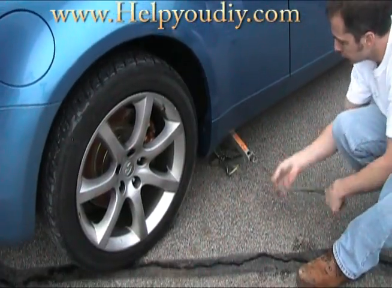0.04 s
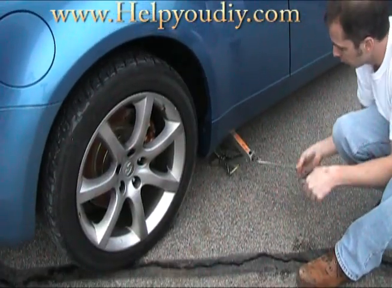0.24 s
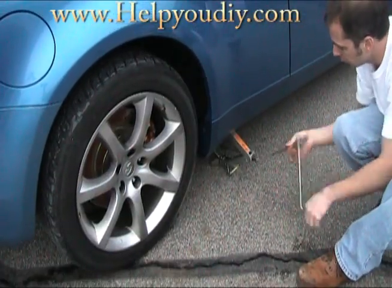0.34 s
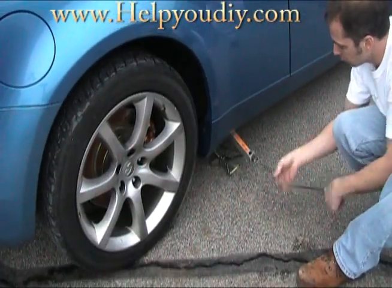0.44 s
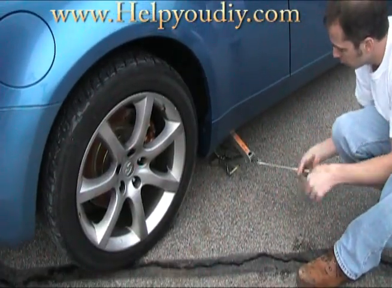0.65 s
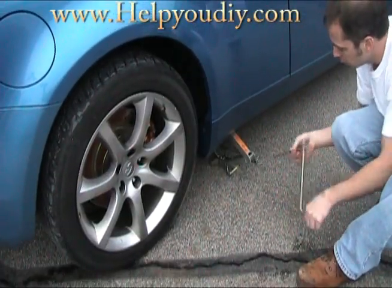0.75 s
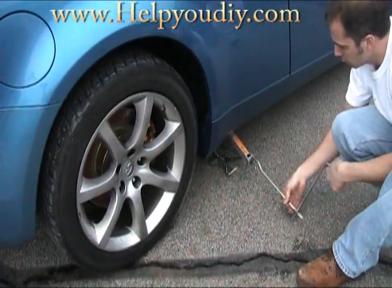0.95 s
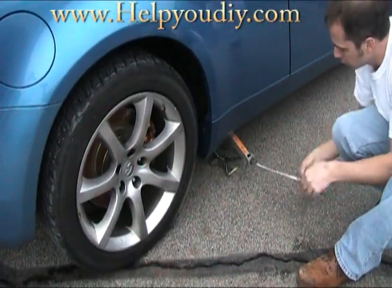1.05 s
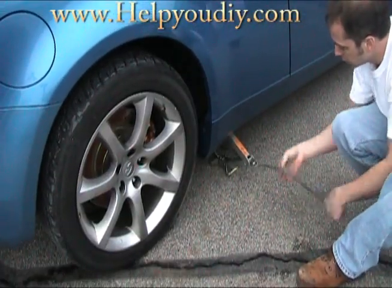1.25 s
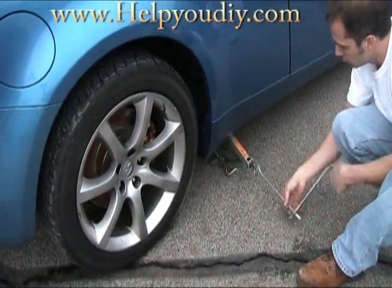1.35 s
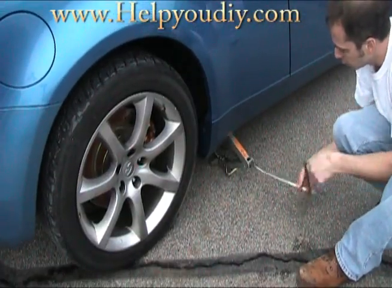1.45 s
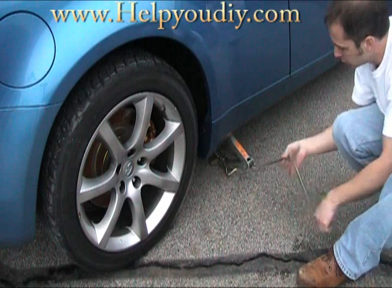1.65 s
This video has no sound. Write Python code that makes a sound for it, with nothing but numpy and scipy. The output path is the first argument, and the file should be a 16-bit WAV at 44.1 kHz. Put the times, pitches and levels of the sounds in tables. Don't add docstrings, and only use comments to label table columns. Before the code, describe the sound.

Metal jack handle: an early tick, then a sharp jangling rattle that rings briefly, followed by quiet ticks in small clusters near the end. Open paved yard with short slapback, low traffic hum, a camcorder microphone nearby.

```python
import sys
import numpy as np
from scipy import signal
from scipy.fft import rfft, irfft
from scipy.io import wavfile
from scipy.ndimage import uniform_filter1d

SR = 44100
rng = np.random.default_rng(int(sys.argv[2]) if len(sys.argv) > 2 else 0)


def amplitude_ratio(level_db):
    exponent = np.asarray(level_db, float) / 20
    return 10 ** exponent


def store_pcm(level_fs):
    pcm = np.round(np.clip(level_fs, -1, 1) * 32767).astype(np.int16)
    wavfile.write(sys.argv[1], SR, np.atleast_2d(pcm).T)


N = 72765

# (frequency [Hz], density [dB per Hz])
TRAFFIC_COLOUR = [(15, -36.5), (25, -5.5), (133, -3), (281, -7.5), (544, -7.5), (629, -6), (894, -6.5),
                  (2850, -20), (3500, -26), (4550, -58), (7700, -120)]
# (frequency [Hz], likeness [0-1])
AIR_LIKENESS = [(60, 0.63), (130, 0.7), (290, 0.6), (640, 0.8), (1410, 0.7), (3100, 0), (6820, 0.4),
                (15000, 0)]
# (frequency [Hz], lead [rad])
AIR_LEADS = [(25, 1.1), (150, .35), (1000, .2)]
# (frequency [Hz], density [dB per Hz])
RUSTLE_COLOUR = [(1470, -30.5), (2500, -8.5), (2830, -11), (3230, -7.5), (4650, -7.5), (5610, -9.5),
                 (8200, -14.5), (14100, -23.5), (16000, -25.5)]
# (time [s], frequency [Hz], level [dB])
DRONE_LINE = [
    (0, 132.3, -63.5),
    (.5, 130.3, -62.5),
    (.58, 129.4, -53),
    (.7, 130.7, -67),
    (1.15, 131.6, -60),
    (1.43, 131.5, -50.5),
    (1.65, 130.4, -58.5),
]
# (time [s], length [s], level [dB], centre frequency [Hz])
CLOTH_SWELLS = [
    (.01, 0.028, -63.5, 7200),
    (0.71, 0.046, -66.5, 7400),
    (0.967, 0.024, -65, 4200),
    (1.191, 0.042, -67.5, 6960),
    (1.44, 0.037, -66, 4400),
    (1.632, 0.034, -62.5, 8040),
]
# (time [s], frequency [Hz], level [dB], t60 [s])
THUDS = [
    (0.054, 342, -41.5, 0.083),
    (.178, 285, -42.5, 0.075),
    (.234, 340, -33.5, 0.038),
    (.236, 517, -34.5, 0.035),
    (.238, 775, -37.5, 0.049),
    (0.261, 174.8, -42, 0.11),
    (1.031, 136, -33, 0.029),
]
# (frequency [Hz], level [dB])
METAL_LEFT_DB = [(500, 0), (4400, -3), (8000, -2.2), (15000, -4.5)]
# (frequency [Hz], lead [rad])
METAL_LEFT_LEADS = [(1000, .2), (4700, .45), (11000, .3), (11800, 1.3)]
# (frequency [Hz], level [dB], t60 [s])
FRAME_MODES = [(1100, -11, .04), (1593, -10, .045), (2000, -11, .04), (2338, 0, .05), (2930, -1, .045),
               (3600, -7, .035), (4470, -3, .04), (6350, -3, .03), (7000, -2, .05), (7400, -4, .035),
               (8300, -5, .03), (9400, -7, .035), (11500, -14, .025), (12600, -9, .022)]
# (time [s], ring level [dB], brightest frequency [Hz], rattle level [dB])
CLINKS = [(.1385, -54, 3300, -64.5), (.1573, -44, 2970, -35), (.1590, -41.5, 7930, -39),
          (.1630, -28, 1260, -47.5), (.2135, -61.5, 8550, -61.5), (.5915, -52.5, 4760, -55),
          (.5935, -55.5, 9720, -65.5), (.6400, -62.5, 4500, -81.5), (.6870, -62, 2820, -74),
          (.7775, -60, 9000, -60), (.7790, -53, 3320, -58), (.8445, -57, 3550, -53),
          (.8790, -81, 8250, -63.5), (.9270, -65, 7340, -56.5), (.9305, -63, 2300, -55),
          (.9360, -55, 3500, -47), (.9395, -62, 3200, -62), (.9430, -67, 4920, -71),
          (.9505, -68, 4500, -68), (.9830, -62.5, 4500, -68), (.9640, -72, 8000, -62),
          (.9890, -55, 4360, -48), (.9915, -49, 4500, -58), (.9962, -44.5, 7040, -39.5),
          (.9968, -46, 2210, -40), (1.0045, -76, 2270, -42.5), (1.1250, -63.5, 4490, -62.5),
          (1.2400, -66.5, 5450, -61.5), (1.3805, -59, 3030, -53), (1.4060, -58, 4500, -46.5),
          (1.4076, -47, 2300, -44), (1.4080, -52, 6400, -58.5), (1.4110, -50, 4300, -53),
          (1.4160, -66, 2400, -58), (1.4200, -59, 2980, -45), (1.4350, -60, 11500, -52),
          (1.4385, -61.5, 6980, -61), (1.4428, -42, 6650, -39.5), (1.4434, -41.5, 2900, -44.5),
          (1.4440, -49, 12600, -64), (1.4500, -56, 2870, -49), (1.4765, -55.5, 3153, -53.5),
          (1.6060, -72, 7400, -61), (1.6270, -61.5, 3230, -66)]
# (frequency [Hz], density [dB per Hz])
CLINK_COLOUR = [(470, -30), (800, 0), (2300, 0), (3890, -4), (4620, -4.5), (5420, -8.5), (7190, -7),
                (10500, -19.5), (15000, -48)]
# (frequency [Hz], level [dB], t60 [s])
GRIPPED_MODES = [(3094, -50, .2), (4780, -68, .25), (5700, -47, .11), (6433, -68, .2), (7390, -54, .09),
                 (8118, -55, .12), (8685, -58, .09), (11370, -68, .2), (11960, -64, .2), (13800, -62, .15)]
# (frequency [Hz], t60 [s])
ROD_MODES = [(2330, .055), (3094, .17), (3983, .06), (4613, .07), (4778, .045), (5690, .12), (6480, .05),
             (6640, .05), (7405, .06), (8016, .045), (8168, .055), (8770, .045), (9356, .045), (11880, .05),
             (2060, .04), (10690, .1), (11945, .07), (13770, .075), (14900, .12), (15725, .065)]
FIRST_ROD_MODE_DB = [-2.5, -8, -10, -7.5, -9.5, -20.5, -10.5, -10, -13, -6, -11, -6.5, -9, -6.5]
LAST_ROD_MODE_DB = [-7.5, -28.5, -2.5, -18, -28, -20]
# (time [s], ring level [dB], brightest frequency [Hz], rattle level [dB])
CLATTER = [(.2290, -44, 6080, -36.5), (.2322, -21.5, 4070, -26), (.2368, -17, 6100, -24),
           (.2392, -14.5, 4880, -28.5), (.2415, -18.5, 9200, -19.5), (.2437, -21, 8600, -24.5),
           (.2462, -19, 6800, -21), (.2480, -20, 4700, -32.5), (.2500, -22.5, 8600, -37),
           (.2545, -18.5, 3210, -29), (.2580, -23, 8600, -31), (.2615, -23, 4000, -28),
           (.2700, -32.5, 11100, -38), (.2780, -40.5, 8000, -37), (.2850, -45.5, 9030, -44)]
# (frequency [Hz], density [dB per Hz])
CLATTER_COLOUR = [(290, -52.5), (500, -3.5), (2850, -15), (3110, -14.5), (4730, -8), (5390, -13.5),
                  (6420, -12), (12100, -20), (16000, -29)]

TRAFFIC_DB, RUSTLE_DB, DRONE_HALF_DB = -46, -62.5, -61.5
FLOOR_TOP_HZ = 15100
CLOTH_SPREAD_OCT, CLOTH_GRAIN_DB = 0.55, 2.5
YARD_DB, YARD_T60_S, YARD_TOP_HZ = -15, 0.17, 12000
YARD_BLUR_HZ = 420
WALL_S, WALL_DB, WALL_T60_S = 0.069, -23.5, 0.028
FAR_S, FAR_DB, FAR_T60_S = 0.11, -39.5, 0.35
SCATTER_DB, RATTLE_SPREAD_OCT = 1.5, 1.5
CRACK_T60_S, KNOCK_T60_S = 0.012, 0.024
SEAT_S, SEAT_DB, NODE_HZ = 0.2648, -5, 3094
GRIP_S, GRIP_DB, GRIP_TAKES_S = 0.297, -17, 0.008
AFTER_S, AFTER_RISE_S = 0.37, 0.0049
MIC_DIP_HZ, MIC_DIP_DB, MIC_DIP_OCT, MIC_CEILING = 5325, -5, 0.13, 0.7


def read(table, hz):
    t = np.array(table, float)
    return np.interp(np.log(np.maximum(hz, 1)), np.log(t[:, 0]), t[:, 1])


def curve(table, column):
    t = np.array(table, float)
    return np.interp(np.arange(N) / SR, t[:, 0], t[:, column])


def unit(x):
    return x / np.sqrt(np.mean(x ** 2))


def walk(rate):
    k = int(SR / rate)
    held = np.repeat(rng.standard_normal(N // k + 1), k)
    return 1.3 * uniform_filter1d(uniform_filter1d(held, k), k)[:N]


def time_since(s):
    return np.maximum(np.arange(N) / SR - s, 0)


def air(colour, centres_hz, flicker_db):
    hz, out = np.fft.rfftfreq(N, 1 / SR), 0
    like = read(AIR_LIKENESS, hz) ** .5
    turn = np.exp(.5j * read(AIR_LEADS, hz))
    mid, side = (rfft(rng.standard_normal(N)) * amplitude_ratio(read(colour, hz)) for _ in range(2))
    mid, side = mid * np.sqrt(1 + like), side * np.sqrt(1 - like)
    pair = np.array([(mid + side) * turn, (mid - side) / turn])
    for centre in centres_hz:
        octaves = np.log2(np.maximum(hz, 1) / centre)
        band = np.cos(np.pi / 2 * np.clip(octaves, -1, 1)) ** 2
        out = out + irfft(pair * band, N) * amplitude_ratio(flicker_db * walk(13))
    return unit(out)


def traffic():
    return amplitude_ratio(TRAFFIC_DB) * air(TRAFFIC_COLOUR, 2. ** np.arange(4, 13), 0.69)


def drone():
    phase = 2 * np.pi * np.cumsum(curve(DRONE_LINE, 1)) / SR
    firing = amplitude_ratio(curve(DRONE_LINE, 2)) * np.sin(phase)
    half = amplitude_ratio(DRONE_HALF_DB + 3 * walk(6)) * np.sin(phase / 2)
    return np.sqrt(2) * (firing + half)


def cloth():
    t, hz, out = np.arange(N) / SR, np.maximum(np.fft.rfftfreq(N, 1 / SR), 1), 0
    noise = rng.standard_normal(N) + .5 * rng.standard_normal((2, N))
    grains = rfft(noise * amplitude_ratio(CLOTH_GRAIN_DB * walk(160)))
    for s, length, db, centre_hz in CLOTH_SWELLS:
        tone = amplitude_ratio(-6 * (np.log2(hz / centre_hz) / CLOTH_SPREAD_OCT) ** 2)
        swell = np.exp(-.5 * ((t - s) / length) ** 2)
        out = out + amplitude_ratio(db) * swell * unit(irfft(grains * tone, N))
    return out


def rustle_and_cloth():
    rustle = amplitude_ratio(RUSTLE_DB) * air(RUSTLE_COLOUR, 2. ** np.arange(12, 15), 0.78)
    top = signal.ellip(8, .2, 60, FLOOR_TOP_HZ, fs=SR, output="sos")
    return signal.sosfilt(top, rustle + cloth())


def thuds():
    out = 0
    for s, hz, db, t60 in THUDS:
        t = time_since(s)
        out = out + 2 * amplitude_ratio(db - 60 * t / t60) * (1 - np.exp(-t / 0.0047)) * np.sin(2 * np.pi * hz * t)
    return out


def yard(x):
    t = np.arange(SR // 2) / SR
    shape = amplitude_ratio(YARD_DB - 60 * t / YARD_T60_S)
    shape = shape + (t > WALL_S) * amplitude_ratio(WALL_DB - 60 * (t - WALL_S) / WALL_T60_S)
    shape = shape + (t > FAR_S) * amplitude_ratio(FAR_DB - 60 * (t - FAR_S) / FAR_T60_S)
    same, own = rng.standard_normal(len(t)), rng.standard_normal((2, len(t)))
    tail = (same + .6 * own) * shape / np.sqrt(YARD_T60_S * SR / 14)
    tail = signal.sosfilt(signal.butter(2, YARD_TOP_HZ, fs=SR, output="sos"), tail)
    blurred = x * walk(YARD_BLUR_HZ)
    return signal.fftconvolve(blurred[None], tail, axes=1)[:, :N]


def ports(x):
    hz = np.fft.rfftfreq(N, 1 / SR)
    half = amplitude_ratio(read(METAL_LEFT_DB, hz) / 2) * np.exp(.5j * read(METAL_LEFT_LEADS, hz))
    return np.array([irfft(rfft(x) * half, N), irfft(rfft(x) / half, N)])


def near(hz, top_hz, spread_oct):
    return -6 * (np.log2(np.maximum(hz, 1) / top_hz) / spread_oct) ** 2


def strikes(hits, modes, spread_oct, colour, rattle_t60, contact_db, crack_db, knock, rise_s):
    size = 16384
    out, t, bins = np.zeros(N + size), np.arange(size) / SR, np.fft.rfftfreq(size, 1 / SR)
    hz, db, t60 = np.array(modes, float).T[:, :, None]
    times = np.array(hits)[:, :1]
    for s, ring_db, top_hz, rattle_db in hits:
        scatter_db = SCATTER_DB * rng.standard_normal(hz.shape)
        gain = amplitude_ratio(ring_db + db + near(hz, top_hz, spread_oct) + scatter_db)
        gain = gain * rng.choice([-1, 1], hz.shape)
        later = np.sum((times > s) * np.clip((t + s - times) / .001, 0, 1), axis=0)
        fade_db = -60 * t / t60 + contact_db * later * (hz < 14000) * hz / 10000
        seat_db = SEAT_DB * (s < SEAT_S) * np.clip((t + s - SEAT_S) / .001, 0, 1)
        fade_db = fade_db + seat_db * (hz != NODE_HZ) * (hz < 14000)
        ring = np.sum(gain * amplitude_ratio(fade_db) * np.sin(2 * np.pi * hz * t), axis=0)
        ring = ring * (1 + knock * amplitude_ratio(-60 * t / KNOCK_T60_S))
        tone = amplitude_ratio(read(colour, bins) + near(bins, top_hz, RATTLE_SPREAD_OCT))
        rattle = unit(irfft(rfft(rng.standard_normal(size)) * tone, size)) * amplitude_ratio(rattle_db + seat_db)
        rattle = rattle * (amplitude_ratio(-60 * t / rattle_t60) + amplitude_ratio(crack_db - 60 * t / CRACK_T60_S))
        start = int(s * SR)
        out[start:start + size] += 2 * (ring + rattle) * (1 - np.exp(-t / rise_s))
    return out[:N]


def frame_clinks():
    return strikes(CLINKS, FRAME_MODES, spread_oct=0.33, colour=CLINK_COLOUR, rattle_t60=0.038,
                   contact_db=0, crack_db=3, knock=2.2, rise_s=0.0003)


def gripped_rod():
    out, t = 0, time_since(AFTER_S)
    for hz, db, t60 in GRIPPED_MODES:
        level = amplitude_ratio(db - 60 * t / t60 + 4.3 * walk(92))
        out = out + level * (1 - np.exp(-t / AFTER_RISE_S)) * np.sin(2 * np.pi * hz * t)
    return out


def rod_clatter():
    hz, t60 = np.array(ROD_MODES).T
    modes = np.column_stack([hz, [*FIRST_ROD_MODE_DB, *LAST_ROD_MODE_DB], t60])
    free = strikes(CLATTER, modes, spread_oct=0.88, colour=CLATTER_COLOUR, rattle_t60=0.053,
                   contact_db=0.5, crack_db=-11.5, knock=0, rise_s=0.0002)
    grip = np.clip((np.arange(N) / SR - GRIP_S) / GRIP_TAKES_S, 0, 1)
    return free * amplitude_ratio(GRIP_DB * grip)


def jack():
    metal = rod_clatter() + gripped_rod() + frame_clinks()
    return signal.sosfilt(signal.butter(1, 500, "high", fs=SR, output="sos"), metal)


def scene():
    metal = jack()
    background = traffic() + drone() + rustle_and_cloth()
    return background + thuds() + yard(metal) + ports(metal)


def roll_off(x):
    return signal.sosfilt(signal.butter(12, 15900, fs=SR, output="sos"), x)


def record(dry):
    hz = np.maximum(np.fft.rfftfreq(N, 1 / SR), 1)
    dip = amplitude_ratio(MIC_DIP_DB * np.exp(-.5 * (np.log2(hz / MIC_DIP_HZ) / MIC_DIP_OCT) ** 2))
    mic = MIC_CEILING * np.tanh(irfft(rfft(dry) * dip, N) / MIC_CEILING)
    return roll_off(mic)


dry = scene()
out = record(dry)
store_pcm(out)
```